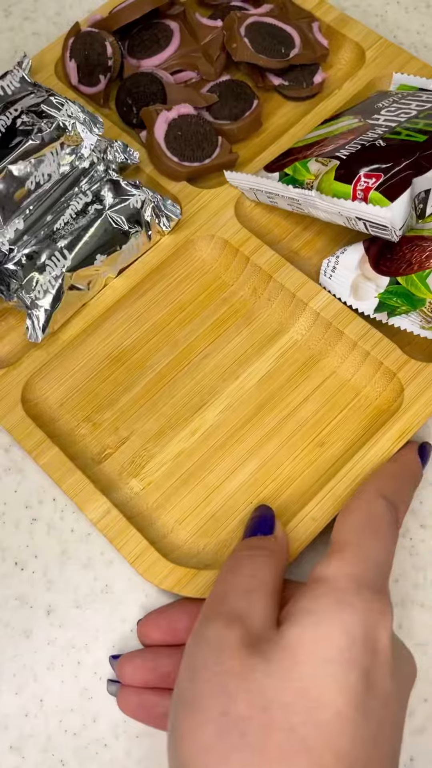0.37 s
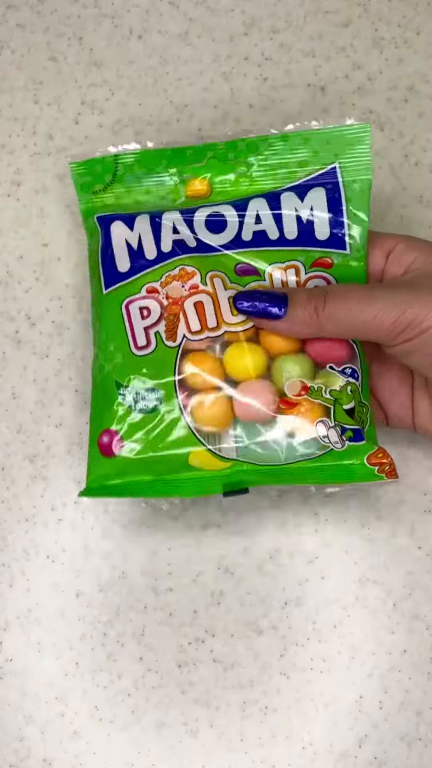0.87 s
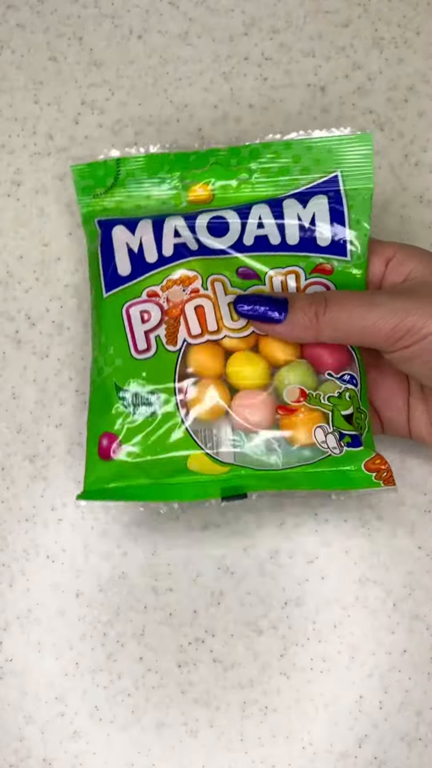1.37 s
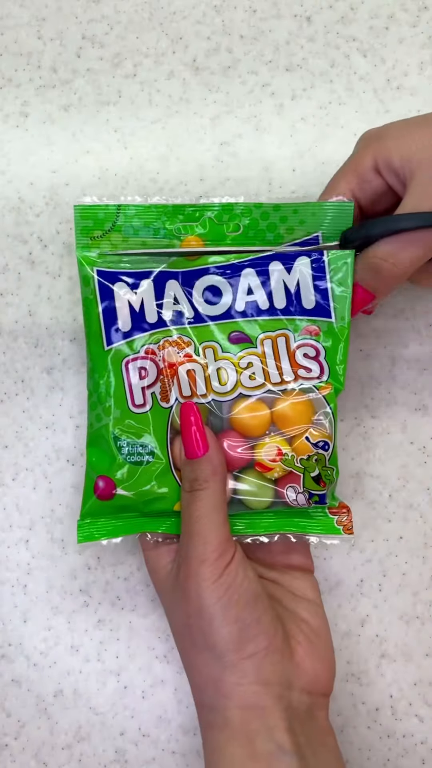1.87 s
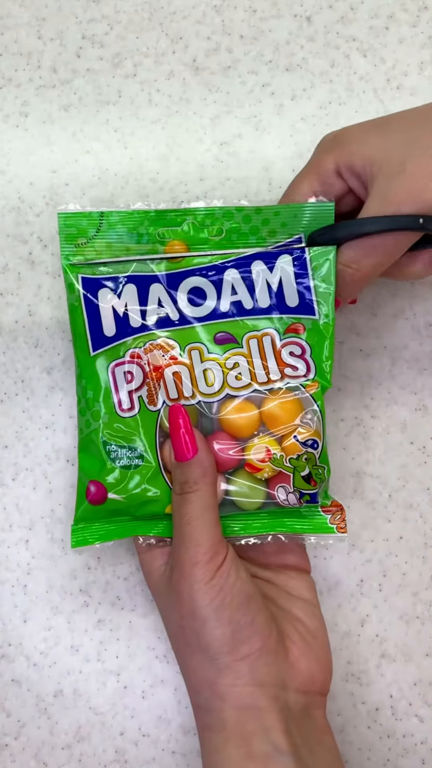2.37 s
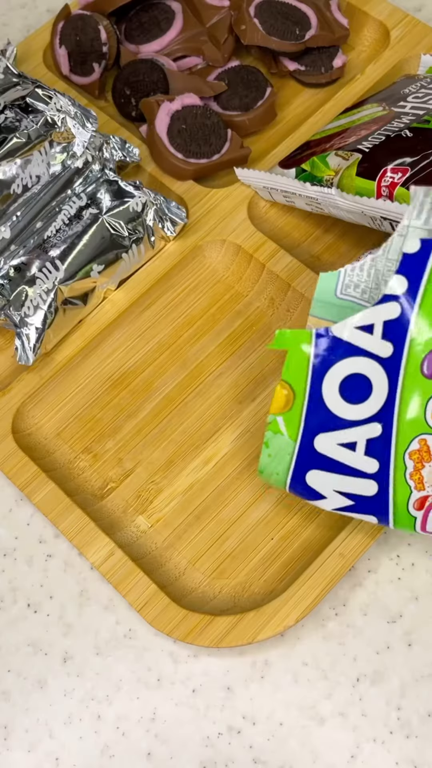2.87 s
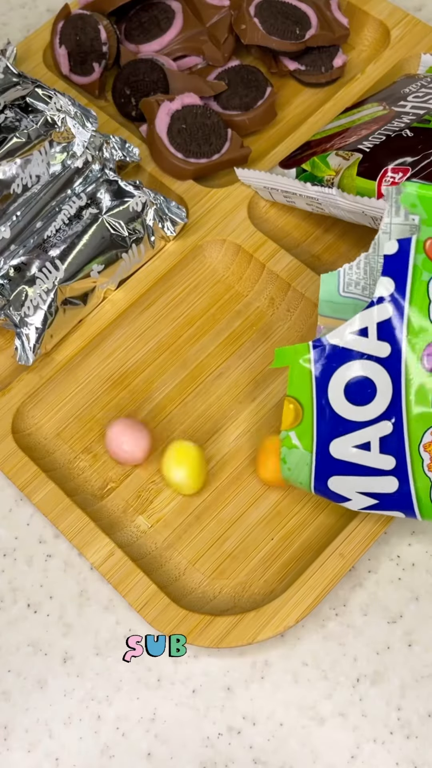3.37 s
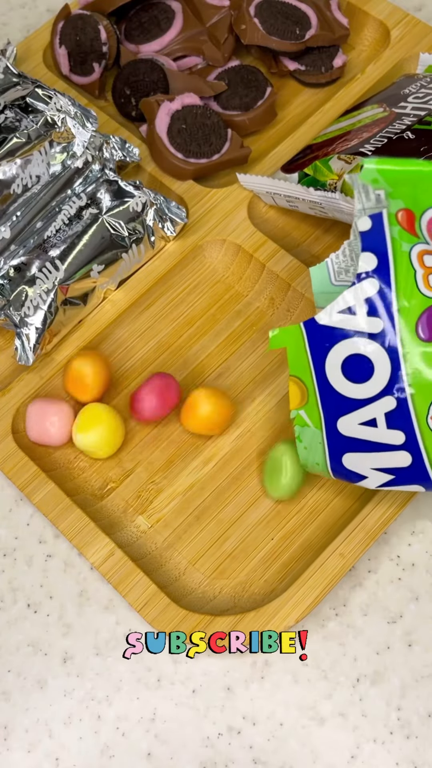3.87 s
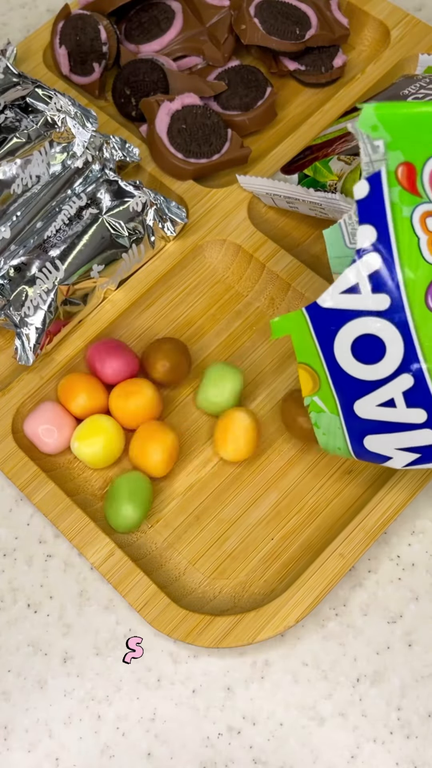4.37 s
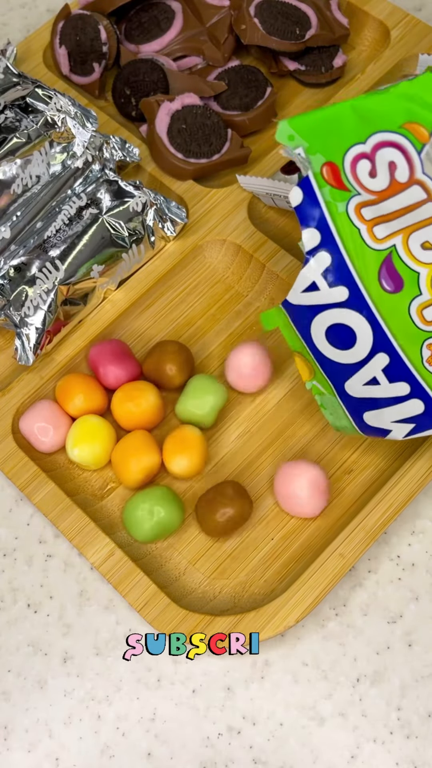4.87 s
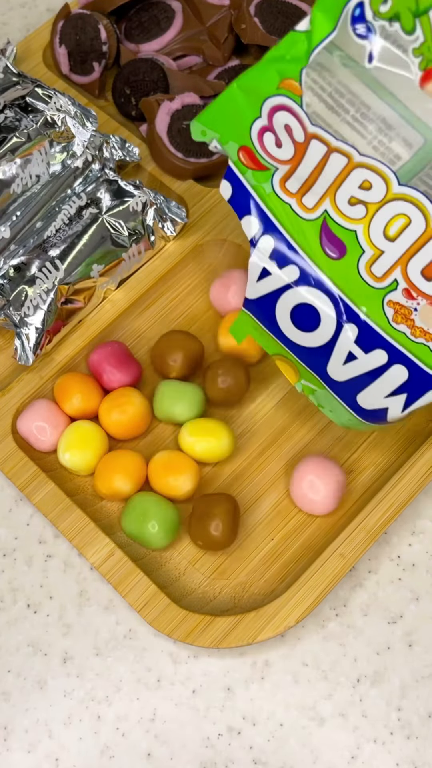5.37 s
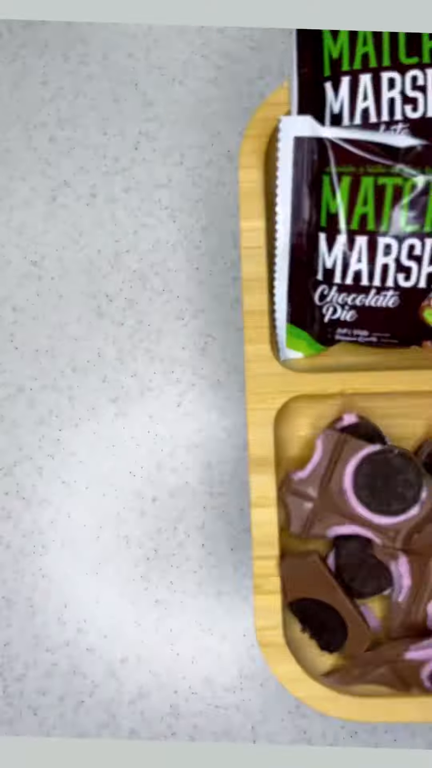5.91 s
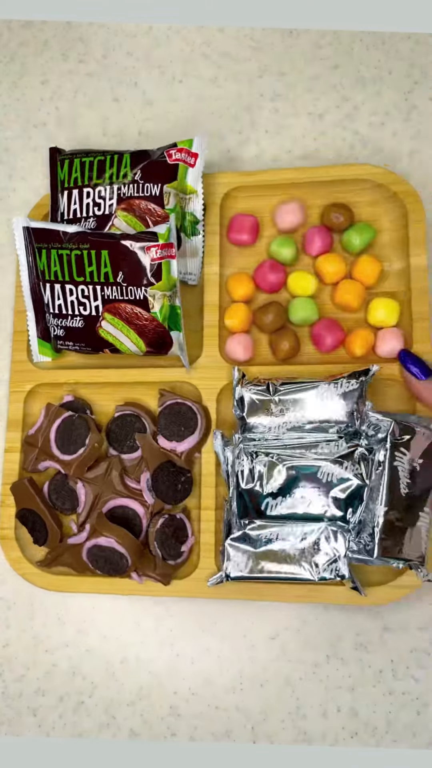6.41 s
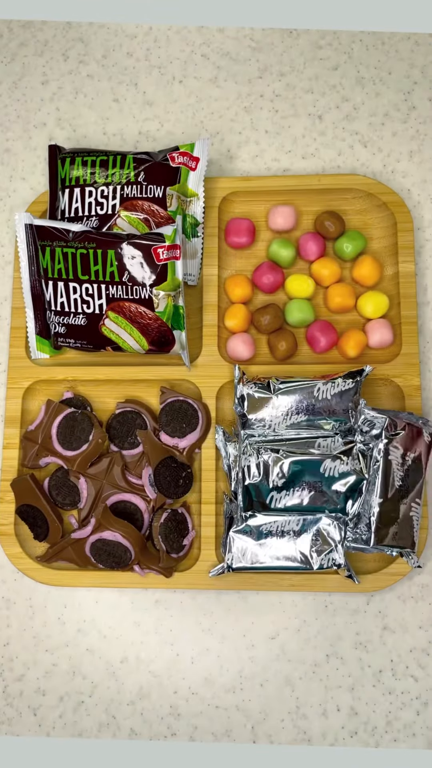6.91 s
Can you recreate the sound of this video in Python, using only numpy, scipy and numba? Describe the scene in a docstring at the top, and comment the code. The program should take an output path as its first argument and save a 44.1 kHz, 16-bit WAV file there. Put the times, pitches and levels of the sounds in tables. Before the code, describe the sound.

A plastic bag of hard sweets is shaken, snipped open with scissors, then emptied clacking onto a wooden tray, ending with nail taps and a soft thump.

```python
"""Hard sweets in a plastic bag, heard close up in a quiet kitchen: the bag is shaken, cut open with scissors and
tipped over a wooden tray, where the sweets land, bounce and roll; then a fingernail taps and the tray is set down.
Blows ring the damped modes of each object; dense runs of tiny blows make rattle, scrape and crinkle.
A phone microphone close by hears this with short room echoes and a low noise rumble, through a peak limiter."""
import sys
import numpy as np
from scipy import signal
from scipy.fft import rfft, irfft
from scipy.io import wavfile
from scipy.ndimage import uniform_filter1d, minimum_filter1d
from numba import njit

SR = 44100
rng = np.random.default_rng(int(sys.argv[2]) if len(sys.argv) > 2 else 0)


def volts(x):
    """Linear amplitude factor 10**(x/20) for a level x in dB, scalar or array-like."""
    e = np.asarray(x, float) / 20
    return 10 ** e


def to_wav(s):
    """Save 16-bit WAV."""
    ch = np.atleast_2d(s).T  # columns
    pcm = np.round(np.clip(ch, -1, 1) * 32767)  # PCM
    wavfile.write(sys.argv[1], SR, pcm.astype(np.int16))


N = 309582

# cuts between the close-up sections: start_s of every section but the first
CUTS_S = [.414, 1.649, 2.872, 5.883, 6.972]
# room rumble, shape of its spectrum: pitch_hz [Hz], density_db [dB per Hz, relative]
RUMBLE_SHAPE = [(18, -39.5), (30, -19.5), (65, -8.5), (135, 0.5), (315, -10.5), (458, -23), (585, -23.5),
                (932, -28), (1240, -29.5), (1590, -32.5), (1850, -33.5), (2580, -36), (6000, -57.5),
                (7800, -51), (13200, -120)]
# room rumble, one row a section: deep_db [dB rms], upper_db [dB rms]
RUMBLE_LEVELS = [(-54.5, -54.5), (-54.5, -69.5), (-50.5, -60.5), (-54.5, -61), (-54, -49.5), (-46, -54.5)]

# Object modes: pitch_hz [Hz], width_hz [Hz], level_db [dB within the set]; widths under 10 Hz ring as 10 Hz
# bag full of sweets
BAG_MODES = [(90, 110, -25), (200, 130, -19.5), (372, 230, -22), (685, 180, -8), (980, 122, -4.5),
             (1185.5, 51, -11.5), (1670, 310, -1.5), (2440, 560, 4.5), (3210, 1020, 11), (3880, 290, -8),
             (4920, 690, 7), (5890, 280, -3.5)]
# scissor blades
BLADE_MODES = [(594, 130, -27), (863, 170, -3.5), (1264, 65, 1.5), (1586, 61, -3), (2054, 340, 3.5),
               (3140, 230, 5), (3940, 200, -7.5), (4620, 226, 7.5)]
# wooden tray hit by sweets
TRAY_MODES = [(116.9, 7.5, -40), (171.2, 13, -38.5), (343, 165, -25.5), (523, 526, -18), (800, 290, -18.5),
              (1270, 190, -15), (1600, 190, -15), (1850, 140, -12), (2200, 170, -4), (2550, 150, -3),
              (2700, 150, -4), (3270, 160, -2), (3450, 175, 0), (3950, 170, -6), (4200, 150, -10),
              (4400, 150, -9), (4650, 180, -4), (4724, 300, 2.5), (5380, 265, -7.5), (5880, 147, -22),
              (6080, 220, -9.5), (6710, 550, -7)]
# fingernail taps and faint scrapes
NAIL_MODES = [(640, 430, -5.5), (1390, 160, -1), (2370, 177, 5.5), (3050, 57, -6.5), (3760, 450, 6.5),
              (4940, 120, -0.5)]
# crinkling film, also the thin crack on top of every blow
FILM_MODES = [(6640, 1170, 21.5), (7900, 200, 4), (9150, 315, 0), (10330, 5100, -6.5), (11600, 570, 3),
              (14200, 1200, -9)]
# film sheared by the blades
SHEAR_MODES = [(6340, 780, -12.5), (7780, 910, -5.5), (9260, 1200, -11), (11240, 1080, -5.5),
               (13800, 2100, 1)]
# board of the tray against the worktop
BOARD_MODES = [(140, 40, -4), (188, 19, -1), (285, 60, -2), (390, 80, -6), (640, 100, -9), (950, 100, -13)]

# faint scrape and wrapper rustle, at the very start, after the first taps and as the tray shifts:
# start_s [s], hold_s [s], scrape_db [dB rms], wrappers_db [dB rms]
SCRAPES = [(0, 0.017, -56, -66), (6.442, 0.021, -39, -59), (6.556, 0.087, -59, -56.5),
           (6.73, 0.098, -47.5, -51)]
# jerks of the wrist, the sweets piling into one end of the bag: start_s [s], hold_s [s], rattle_db [dB rms]
SHAKES = [(0.416, 0.0082, -29.5), (0.491, 0.038, -18), (0.597, 0.047, -25), (0.723, 0.031, -19.5),
          (0.854, 0.021, -20), (0.974, 0.012, -11.5), (1.099, 0.012, -21), (1.206, 0.031, -19),
          (1.33, 0.011, -18.5), (1.454, 0.015, -17), (1.554, 0.042, -22.5)]
# sweets clacking in the bag: start_s [s], body_db [dB], crack_db [dB]
CLACKS = [(.434, -14.5, -52), (.46, -33, -39), (.4868, -22, -13), (.5027, 11.5, -6), (.5903, -18.5, -45),
          (.6989, -34, -40), (.7205, -6, -23.5), (.7496, -11, -10.5), (.8137, -3, -39.5), (.8562, 3, -11.5),
          (.961, -8, -27.5), (.9677, 9, -25.5), (.9919, 6, -10), (1.0053, -20, -26), (1.089, -15, -24),
          (1.103, -30, -16.5), (1.1777, 0.5, -51), (1.2116, -14, -8), (1.3081, -15.5, -19),
          (1.4331, 1, -12), (1.4531, -12.5, -48.5), (1.5545, -7.5, -10.5), (1.5708, 11.5, -6.5),
          (1.6025, -13, -37)]
# strokes of the scissors: start_s [s], hold_s [s], blades_db [dB rms], sheared_film_db [dB rms]
STROKES = [(1.67, 0.035, -58.5, -72), (1.753, 0.11, -44.5, -51), (1.911, 0.039, -47, -52.5),
           (2.044, 0.049, -57.5, -77), (2.195, 0.046, -34, -38.5), (2.39, .095, -40.5, -44.5),
           (2.517, 0.081, -49, -53.5), (2.734, 0.02, -30.5, -33.5)]
# snips of the blades: start_s [s], body_db [dB], crack_db [dB]
SNIPS = [(1.8333, -9, -11), (1.9115, -17.5, -57.5), (1.9317, -52, -43), (1.9477, -24, -19.5),
         (2.0864, -35, -54), (2.17, -32, -51), (2.1929, -33, -40.5), (2.238, -12, -26),
         (2.2467, -34, -16.5), (2.2633, -12, -14.5), (2.3797, -22, -57), (2.391, -25.5, -33),
         (2.3997, -21, -25.5), (2.4764, -17.5, -9.5), (2.4939, -21.5, -33), (2.6006, -30, -42),
         (2.7216, -20.5, -30.5), (2.7347, -18.5, -44.5), (2.7577, -9.5, -40), (2.7737, -47, -27)]
# sweets sliding from the tipped bag: start_s [s], level_db [dB, before the gain of each layer it drives]
TIP = [(2.88, -59), (3.07, -34), (3.19, -33.5), (3.26, -45), (3.49, -25), (3.8, -35.5), (4.09, -36),
       (4.2, -48), (4.43, -34), (4.55, -40.5), (4.96, -32), (5.09, -34.5), (5.25, -47.5), (5.47, -40.5),
       (5.63, -29), (5.88, -50)]
# sweets landing on the tray: start_s [s], body_db [dB], crack_db [dB]
DROPS = [(2.9898, -25.5, -40.5), (3.0402, -31, -28), (3.0732, -30, -27), (3.0898, -8.5, -12.5),
         (3.1031, -9, -16), (3.1367, -17, -15.5), (3.1644, -23, -27), (3.2069, 9, -23.5),
         (3.2451, 4.5, -33), (3.2783, -4.5, -45), (3.296, -1, -17.5), (3.3292, -6, -36),
         (3.3425, -13.5, -22), (3.3616, -22, -15.5), (3.3845, 1.5, -21), (3.4084, -16.5, -48.5),
         (3.425, -11.5, -43.5), (3.4473, -18.5, -57), (3.4585, -13.5, -7), (3.4765, -9, -6.5),
         (3.5145, -6.5, -28), (3.526, -2, -38), (3.5602, -17.5, -15.5), (3.5851, -18, -8.5),
         (3.6165, 9, -16.5), (3.6514, -3.5, -37), (3.714, 11.5, -9), (3.7532, -2, -52), (3.7652, 7, -19),
         (3.7908, -7.5, -21), (3.8055, -7.5, -47.5), (3.829, 10, -13.5), (3.8509, -9, -52.5),
         (3.8762, -16.5, -16.5), (3.8902, -24, -22.5), (3.9081, -28.5, -27), (3.9276, -12, -19),
         (3.9393, -21.5, -51), (3.9621, 7.5, -22), (3.9938, -1, -45.5), (4.0085, -1.5, -43.5),
         (4.0236, -3, -42.5), (4.0356, -7.5, -19.5), (4.0755, -17, -39), (4.1019, -29.5, -16.5),
         (4.1396, 9.5, -33.5), (4.1518, 6.5, -9), (4.1895, -5, -37.5), (4.2107, -6.5, -35.5),
         (4.2205, -4, -34.5), (4.2408, -11, -44), (4.2537, -12.5, -27), (4.272, -11.5, -27),
         (4.3718, -17, -54.5), (4.3934, 12, -11), (4.4532, -2.5, -38), (4.4822, -4.5, -34),
         (4.5004, -19, -51), (4.5365, 11, -4), (4.5958, 1, -16.5), (4.6271, -8, -20.5),
         (4.6449, -16, -38.5), (4.7547, 14, -1.5), (4.7733, 1.5, -9), (4.8061, -9, -42), (4.8258, -11, -17),
         (4.8821, -20.5, -35), (4.9296, 7, -16), (4.9709, 9.5, -8.5), (4.9891, -15, -42.5),
         (5.0324, -1, -29), (5.0549, 11.5, -6), (5.0787, -8.5, -43), (5.1027, -15.5, -22),
         (5.1229, -13, -38), (5.1417, -5, -33.5), (5.1839, -11.5, -26), (5.2018, -15.5, -48),
         (5.248, -23, -67), (5.3149, -48, -32), (5.3457, -30, -27.5), (5.3871, -18.5, -20),
         (5.4467, -24.5, -27), (5.4857, 7, -10.5), (5.496, 6, -7.5), (5.5315, -6.5, -44.5),
         (5.5412, -18, -46), (5.5478, 10.5, -4.5), (5.5885, -16.5, -29), (5.6051, 13.5, -13.5),
         (5.6155, 2.5, -11), (5.6309, -12.5, -23), (5.64, 12, -13.5), (5.6561, -1.5, -15.5),
         (5.6651, -3.5, -22.5), (5.6736, -5, -22.5), (5.7035, -10, -27), (5.717, -10, -38),
         (5.7419, -11.5, -45.5), (5.7593, -4, -22.5), (5.7951, -13.5, -37), (5.8008, -18.5, -51),
         (5.8277, -27, -49), (5.8678, -22.5, -19.5)]
# dull knocks of the nearly empty bag buckling: start_s [s], level_db [dB]
BUCKLES = [(5.3457, -35), (5.3838, -23), (5.4473, -28.5), (5.456, -25.5)]
# fingernail taps: start_s [s], body_db [dB], crack_db [dB]
TICKS = [(5.8998, -44, -42), (5.9677, -54, -42.5), (6.0085, -33.5, -38.5), (6.0202, -47, -45.5),
         (6.0476, -54, -44), (6.3327, -34, -95), (6.3911, -43.5, -63), (6.4054, 9.5, -16.5),
         (6.4154, -0.5, -16), (6.4232, -1, -52.5), (6.5502, -37, -54), (6.5827, -28.5, -38),
         (6.6563, -34, -46), (6.6706, -29, -24.5), (6.695, -29.5, -31), (6.756, -46, -35),
         (6.777, -29, -24.5), (6.805, -8, -27), (6.8369, -29, -25.5)]
# tray meeting the worktop: start_s [s], board_db [dB], jolted_load_db [dB]
THUMPS = [(6.407, -13.5, -12.5), (6.418, -57, -18), (6.804, -10, -24.5), (6.811, -5, -13)]


def section():
    """Number of the close-up section that each sample belongs to."""
    return np.searchsorted(CUTS_S, np.arange(N) / SR)


def unit(x):
    """Scale to rms 1."""
    return x / np.sqrt(np.mean(x ** 2))


def rumble():
    """Low noise of the house; its deep and upper parts change level from section to section."""
    hz, db = np.transpose(RUMBLE_SHAPE)
    f = np.arange(N // 2 + 1) * SR / N + 1
    noise = volts(np.interp(np.log(f), np.log(hz), db)) * rfft(rng.standard_normal(N))
    deep = 1 / (1 + (f / 170) ** 6)  # the parts meet at 170 Hz
    deep_gain, upper_gain = volts(RUMBLE_LEVELS)[section()].T
    deep_noise = unit(irfft(deep * noise, N))
    upper_noise = unit(irfft((1 - deep) * noise, N))
    return deep_gain * deep_noise + upper_gain * upper_noise


@njit
def rings(length, at, pole, start, rise):
    """Sum of damped modes: each swells while the contact lasts and dies away to 0.3 % of its start."""
    out = np.zeros(length)
    for k in range(len(at)):
        z, gap, i = start[k], 1., at[k]
        stop = .003 * abs(z)
        while abs(z) > stop and i < length:
            gap *= rise
            out[i] += z.imag * (1 - gap)
            z *= pole[k]
            i += 1
    return out


def ring(modes, s, size, tilt_db, spot_db, detune, contact_s, reach=0.96):
    """Blows ring the modes; each lands on its own spot, so strength, phase and pitch of every mode differ a little."""
    luck = rng.standard_normal((len(s), 3, len(modes)))
    heard = size > 1e-6
    luck, s, size, tilt_db = luck[heard], s[heard], size[heard], tilt_db[heard]
    hz, width, db = np.transpose(modes)
    # brightness acts at most reach octaves below the middle mode
    octaves = np.maximum(np.log2(hz / hz[len(hz) // 2]), -reach)
    gain = volts(db + spot_db * luck[:, 0] + np.outer(tilt_db, octaves))
    gain *= (size / np.sqrt(np.sum(gain ** 2, axis=1)))[:, None]
    turning = 2j * np.pi * hz * (1 + detune * luck[:, 1])
    damping = np.pi * np.maximum(width, 10)
    pole = np.exp((turning - damping) / SR)
    # neighbouring modes start in opposite phase, the more loosely the more the spots differ
    phase = np.pi * np.arange(len(modes)) + 0.38 * spot_db * luck[:, 2]
    start = gain * np.exp(1j * phase)
    at = np.repeat((s * SR).astype(np.int64), len(modes))
    return rings(N, at, pole.ravel(), start.ravel(), np.exp(-1 / (contact_s * SR)))


def blows(events, modes, bright, spot_db, detune, reach=0.84):
    """Separate blows on one object, each with a thin crack of five quick clicks; sharper and harder is brighter."""
    s, body_db, crack_db = np.transpose(events)
    # bright: dB per octave at a -30 dB crack and a 0 dB body, more per dB of crack, more per dB of body
    tilt_db = bright[0] + bright[1] * (crack_db + 30.0) + bright[2] * body_db
    late = 0.0018 * rng.exponential(size=(len(s), 5)) * np.minimum(np.arange(5), 1)  # s, the first at once
    clicks = volts(crack_db[:, None] - 220 * late).ravel()  # later clicks are weaker
    click_s = (s[:, None] + late).ravel()
    crack = ring(FILM_MODES, click_s, clicks, 0 * clicks, 4., .08, contact_s=.00008)
    body = ring(modes, s, volts(body_db), tilt_db, spot_db, detune, 0.0001, reach)
    return body + crack


def patter(modes, effort, count, spread_db, detune):
    """A dense run of tiny blows whose rms follows the effort; spread_db > 0: a few strong, < 0: a few faint."""
    chance = rng.random((count, 2))
    place = chance[:, 0] * N
    size = volts(np.minimum(-spread_db * np.log(1 - chance[:, 1]), 24))
    _, width, db = np.transpose(modes)
    # a mode of strength g and width w rings out an energy of g^2 / (4 pi w)
    energy = np.sum(volts(2 * db) / (4 * np.pi * width)) / np.sum(volts(2 * db))
    size *= effort[place.astype(int)] / np.sqrt(np.sum(size ** 2) * energy * SR / N)
    return ring(modes, place / SR, size, 0 * size, 7.45, detune, contact_s=0.00011)


def swells(start, length, db, rise_db_s, fall_db_s):
    """Gain of movements that rise, hold and fall away, each within its own section."""
    t, out = np.arange(N) / SR, np.zeros(N)
    for s, hold, top in np.broadcast(start, length, db):
        away = rise_db_s * np.maximum(s - t, 0) + fall_db_s * np.maximum(t - s - hold, 0)
        out += volts(top - away) * (section() == np.searchsorted(CUTS_S, s))
    return out


def pouring():
    """Gains of sliding sweets and of crinkling film while the bag is tipped; the film grows faster."""
    slide_db = np.interp(np.arange(N) / SR, *np.transpose(TIP))
    film_db = -59.5 + 1.47 * (slide_db + 39)  # -59.5 dB at a slide of -39 dB
    tipped = section() == 3
    return volts(slide_db) * tipped, volts(film_db) * tipped


def faint_scrapes():
    """Faint scrapes at the very start and late on, each a run of tiny blows nearly alike in strength."""
    s, hold, scrape_db, _ = np.transpose(SCRAPES)
    scrape = swells(s, hold, scrape_db, rise_db_s=401.5, fall_db_s=182)
    return patter(NAIL_MODES, scrape, count=10000, spread_db=-1.0, detune=0.148)


def film_crinkle():
    """Film and wrappers crackle in tiny snaps with the faint scrapes, the shaking and the tipping of the bag."""
    s, hold, _, wrappers_db = np.transpose(SCRAPES)
    crinkle = pouring()[1] + swells(s, hold, wrappers_db, rise_db_s=401.5, fall_db_s=182)
    s, hold, rattle_db = np.transpose(SHAKES)
    # the film lies 15.5 dB under the rattle
    crinkle += swells(s, hold, rattle_db - 15.5, rise_db_s=400.5, fall_db_s=263.5)
    return patter(FILM_MODES, crinkle, count=18000, spread_db=3.0, detune=0.12)


def shaken_bag():
    """Sweets tumble in tiny blows at every jerk of the wrist, with louder separate clacks."""
    s, hold, rattle_db = np.transpose(SHAKES)
    tumble = swells(s, hold, rattle_db, rise_db_s=509.5, fall_db_s=315)
    rattle = patter(BAG_MODES, tumble, count=20000, spread_db=3.5, detune=0.065)
    return rattle + blows(CLACKS, BAG_MODES[2:], (.1, .2, .01), spot_db=2.0, detune=0.055)


def scissors():
    """Blades saw and snip through the bag, and the sheared film parts in tiny high snaps."""
    s, hold, blades_db, film_db = np.transpose(STROKES)
    saw = swells(s, hold, blades_db, rise_db_s=1000, fall_db_s=212)
    part = swells(s, hold, film_db, rise_db_s=1000, fall_db_s=327.5)
    sawing = patter(BLADE_MODES, saw, count=30000, spread_db=1.8, detune=0.14)
    snips = blows(SNIPS, BLADE_MODES, (.1, 0.17, 0.014), spot_db=3.87, detune=0.059)
    shear = patter(SHEAR_MODES, part, count=20000, spread_db=1.0, detune=0.039)
    return sawing + snips + shear


def tipped_bag():
    """Sweets slip out along the film in small blows; the nearly empty bag buckles with dull knocks."""
    slide = .6 * patter(BAG_MODES[5:], pouring()[0], count=12000, spread_db=3.2, detune=.15)
    s, db = np.transpose(BUCKLES)
    return slide + ring(BAG_MODES[2:7], s, volts(db), 0 * s, 2.7, .05, contact_s=0.000295)


def sweets_on_tray():
    """Sweets land and bounce as blows on the wood, and roll as a run of tiny ones."""
    rolling = 0.3 * patter(TRAY_MODES, pouring()[0], count=6000, spread_db=2.5, detune=0.019)
    return rolling + blows(DROPS, TRAY_MODES, (-3, .12, .45), spot_db=1.8, detune=.008, reach=.15)


def nail_taps():
    """A fingernail ticks in short blows."""
    return blows(TICKS, NAIL_MODES, (-1.1, 0.4, .01), spot_db=1.6, detune=0.033)


def tray_set_down():
    """The board thumps on the worktop, a soft 2 ms contact, and shakes its load."""
    s, board_db, load_db = np.transpose(THUMPS)
    thumps = ring(BOARD_MODES, s, volts(board_db), 0 * s, 1., .005, contact_s=.002)
    # the jolted load jumps many times within a few hundredths of a second
    chance = rng.exponential(size=(len(s), 2, 40))
    when = (s[:, None] + 0.0096 * chance[:, 0]).ravel()
    size = (volts(load_db)[:, None] * chance[:, 1] * np.exp(-chance[:, 0])).ravel()
    load = ring(NAIL_MODES + FILM_MODES, when, size, 0 * when - 2.5, 5., .1, contact_s=.0001)
    return thumps + load


def room(x):
    """Short, dense echoes off worktop and walls, a little dull: decaying noise as impulse response."""
    t60_s, level_db, dull_hz = 0.07, -17, 8100
    t = np.arange(SR // 2) / SR
    echo = rng.standard_normal(len(t)) * volts(-60 * t / t60_s) * np.minimum(t / .003, 1)
    echo = signal.lfilter(*signal.butter(1, dull_hz, fs=SR), echo)
    return volts(level_db) * signal.fftconvolve(x, echo / np.sqrt(np.sum(echo ** 2)))[:N]


def scene():
    """Bag and tray in the room, over the rumble; each cut stops the echoes and the next section fades in fast."""
    near = faint_scrapes() + film_crinkle() + shaken_bag() + scissors()
    near += tipped_bag() + sweets_on_tray() + nail_taps() + tray_set_down()
    echoes = np.zeros(N)
    for k in range(len(CUTS_S) + 1):
        inside = section() == k
        echoes += room(near * inside) * inside
    since_cut_s = np.arange(N) / SR - np.array([-1, *CUTS_S])[section()]  # the first section starts at full level
    fade_in = np.minimum(since_cut_s / .01, 1)
    return ((near + echoes + rumble()) * fade_in)[None]


def roll_off(x):
    """The treble ends steeply here."""
    return signal.sosfilt(signal.butter(12, 16970, fs=SR, output="sos"), x)


def record(dry):
    """The phone microphone drops the deepest bass; a look-ahead limiter turns down peaks above 0.92 of full scale."""
    mic = signal.sosfilt(signal.butter(3, 58., "high", fs=SR, output="sos"), dry)
    gain = np.minimum(1, .92 / (np.abs(mic) + 1e-9))
    gain = uniform_filter1d(minimum_filter1d(gain, size=129), size=65)  # acts just ahead of each peak
    release_s = 0.075
    keep = np.exp(-1 / (release_s * SR))
    slow_cut = signal.lfilter([1 - keep], [1, -keep], 1 - gain)
    gain = np.minimum(gain, 1 - slow_cut * 1.5).clip(.1)  # lets go slowly
    return roll_off(mic * gain)


dry = scene()
out = record(dry)
to_wav(out)
```